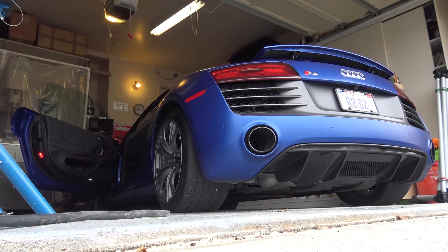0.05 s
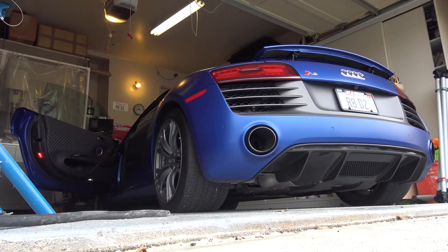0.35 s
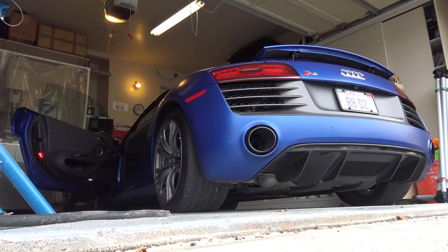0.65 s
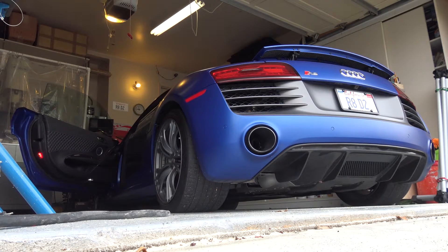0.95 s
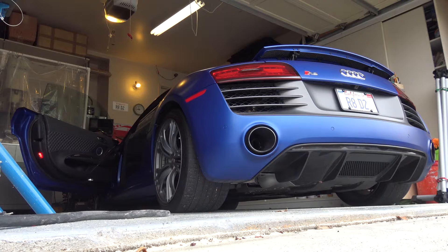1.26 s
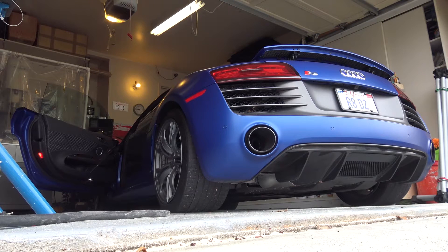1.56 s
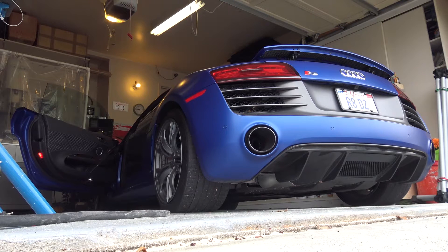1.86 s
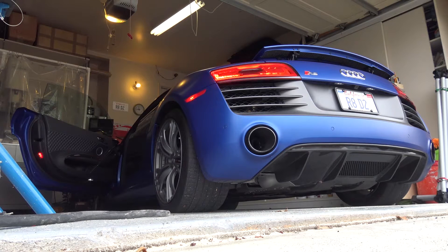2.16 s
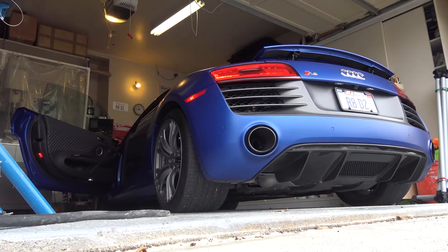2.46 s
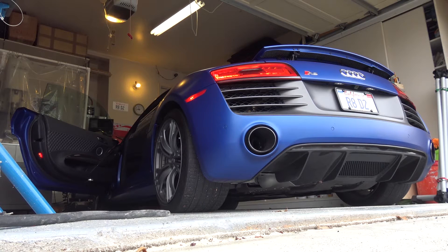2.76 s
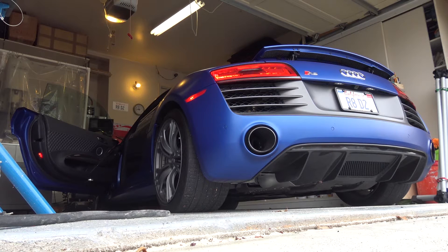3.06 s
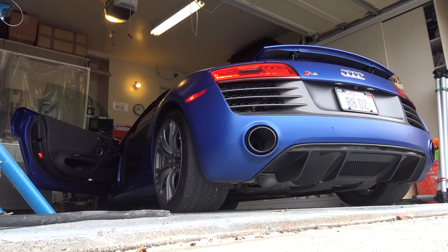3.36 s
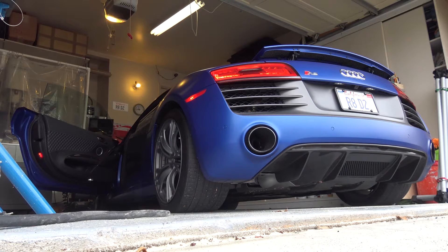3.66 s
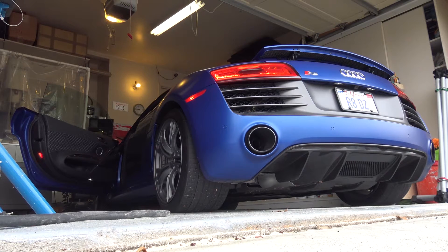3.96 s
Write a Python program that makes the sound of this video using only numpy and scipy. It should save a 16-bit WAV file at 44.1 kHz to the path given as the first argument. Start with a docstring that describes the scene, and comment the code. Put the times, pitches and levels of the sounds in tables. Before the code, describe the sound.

A sports car cranks with a grinding starter, then fires with a deep boom.

```python
"""A sports car is cold-started in a garage, heard from just behind its tail pipes.
Over a low hum and a few small ticks, the solenoid throws in the starter pinion with clacks and squeals.
The gears grind against one compression after another, while pumped air sets the pipes ringing.
Then the engine fires: periodic gas pulses make a deep boom that overloads the microphone."""
import sys
import numpy as np
from scipy import signal
from scipy.fft import rfft, irfft
from scipy.io import wavfile

SR = 44100
rng = np.random.default_rng(int(sys.argv[2]) if len(sys.argv) > 2 else 0)


def file_out(sig):
    """Save sig as 16-bit WAV at sys.argv[1]."""
    # one column per channel
    cols = np.atleast_2d(sig).T
    # limit, then scale
    lim = np.clip(cols, -1, 1)
    pcm = np.round(lim * 32767).astype(np.int16)
    wavfile.write(sys.argv[1], SR, pcm)


N = 176400
T = np.arange(N) / SR

# Levels are relative, ahead of reverberation, panning and limiting; a spectrum gives shape only.
# room noise spectrum: frequency_hz, gain_db
ROOM_SPECTRUM = [(25, -12), (40, -3), (64, -9.5), (88, -5), (125, 1), (150, -6), (243, -16), (275, -25),
                 (360, -22.5), (500, -26.5), (800, -30.5), (1100, -25.5), (1400, -35), (4000, -43),
                 (15000, -49)]
# electric hum: pitch_hz, level_db
HUM_LINES = [(59.2, -50.5), (118.4, -48), (241.5, -58)]
# fading hiss: time_s, level_db
HISS_LEVELS = [(0, -51.5), (.15, -59.5), (.4, -68), (1.1, -85)]
# hiss spectrum: frequency_hz, gain_db
HISS_SPECTRUM = [(500, -3), (1500, 4), (2800, -4.5), (4500, -2.5), (10000, -9), (15000, -15)]
# small ticks: start_s, snap_db, ring_db, ring_hz
TICK_EVENTS = [(.169, -62, -49, 6030), (.615, -54, -75, 5110), (.6594, -67, -58, 5110),
               (.7507, -51, -43.5, 5110), (0.7766, -57, -44.5, 5100), (0.915, -49, -84, 5110)]
# snap spectrum: frequency_hz, gain_db
TICK_SPECTRUM = [(800, -1), (2500, -3), (6000, -4), (11000, 0), (15000, -13)]

# solenoid and pinion impacts: start_s, level_db, t60_s, cutoff_hz
CLACK_EVENTS = [(2.036, -44, 0.088, 4100), (2.125, -33, 0.18, 11000), (2.138, -35, 0.08, 13000),
                (2.157, -29, 0.11, 4000), (2.16, -26, 0.078, 11000), (2.179, -44, 0.64, 6900),
                (2.318, -32.5, 0.1, 6300)]
# spectrum of clacks and scrape: frequency_hz, gain_db
PINION_SPECTRUM = [(100, -1), (600, 4), (1800, 1), (4000, -2.5), (7000, -4.5), (11000, -0.5), (15000, -7)]
# thuds through the car body: start_s, level_db
BODY_THUDS = [(2.045, -43), (2.177, -26.5)]
# whine of the energised starter: pitch_hz, level_db
WHINE_LINES = [(1803, -53.5), (3004, -50), (4221, -57), (6611, -52.5), (10153, -62)]
# fizz around the whine: frequency_hz, gain_db
FIZZ_SPECTRUM = [(500, 9), (3000, -11), (10500, -7), (15000, -14)]
# pinion scraping as it spins up: time_s, level_db
SCRAPE_LEVELS = [(2.29, -51.5), (2.318, -38.5), (2.33, -32.5), (2.39, -34), (2.42, -90)]
# spin-up squeals: start_s, level_db, pitch_hz, hold_s
SQUEAL_EVENTS = [(2.34, -28, 9771, .02), (2.338, -28, 13437, .038)]

# compression strokes: start_s, gear_db, lower_pipe_db, upper_pipe_db
COMPRESSION_STROKES = [(2.384, -16.5, -27, -50), (2.474, -19, -34, -17), (2.608, -18, -37, -23),
                       (2.68, -22, -45, -24), (2.792, -15.5, -22.5, -30), (2.919, -15, -19.5, -28.5),
                       (3.065, -16.5, -26.5, -32), (3.21, -16, -23.5, -31), (3.35, -15, -27, -27.5),
                       (3.495, -14.5, -25, -37.5), (3.63, -15, -24, -22)]
STROKE_ATTACK_S, STROKE_HOLD_S = 0.016, 0.05
# starter housing resonances: centre_hz, width_hz, gain_db
HOUSING_MODES = [(552, 19, -5.5), (1006, 70, 2.5), (1167, 17, 0.5), (1704, 30, -5), (1932, 55, 3.5),
                 (2186, 47, -4), (2900, 16, -6), (3535, 20, -8), (4015, 95, -0.5), (5000, 30, -3),
                 (8340, 140, -5)]
# loaded gears: frequency_hz, gain_db
GEAR_SPECTRUM = [(150, -8.5), (400, -8.5), (560, -10.5), (850, -14), (1000, -2), (1450, 4.5), (2000, -1.5),
                 (2600, -6.5), (4500, -10), (7000, -17), (14000, -45)]
# brighter rasp of the teeth: frequency_hz, gain_db
RASP_SPECTRUM = [(300, -1), (850, 0.5), (1100, -3.5), (2500, 2), (4200, -1), (5500, -4.5), (8500, -8),
                 (11000, -12.5), (15500, -28.5)]
# continuous grind of the starter: time_s, level_db
GRIND_LEVELS = [(2.36, -59), (2.378, -22.5), (2.391, -15.5), (2.45, -37), (2.55, -22), (2.9, -26),
                (3.3, -22.5), (3.6, -23), (3.73, -14.5), (3.82, -10.5), (3.92, -21.5), (4, -32.5)]
# rumble of the turning engine: time_s, level_db
RUMBLE_LEVELS = [(2.38, -39), (2.42, -22), (2.7, -24), (2.78, -25.5), (3.5, -28), (3.72, -25)]
# rumble and thumps: frequency_hz, gain_db
RUMBLE_SPECTRUM = [(20, -43), (35, 5.5), (60, -0.5), (90, -2), (150, 2), (270, -6), (350, -4.5), (440, -32),
                   (1000, -51)]
# crash of the pinion taking the load: frequency_hz, gain_db
CRASH_SPECTRUM = [(400, -0.5), (2500, -7.5), (3800, 1.5), (6000, -1.5), (7500, -17), (11000, -14),
                  (15000, -37)]
# rising gear tones: middle_s, level_db, pitch_hz, sigma_s
GEAR_TONES = [(2.505, -27, 1143, 0.036), (2.62, -21, 1439, 0.018), (2.745, -23.5, 1436, 0.032),
              (2.84, -29, 1364, 0.0093), (2.885, -29, 1486, .02), (2.944, -20, 1892, 0.0095),
              (3.012, -18.5, 1560, 0.022), (3.14, -22, 1588, 0.03), (3.28, -23, 1570, 0.033),
              (3.42, -21.5, 1537, 0.043), (3.545, -23, 1615, 0.013), (3.595, -21, 1955, 0.0093)]
# their partials: pitch_ratio, gain_db
GEAR_PARTIALS = [(.655, -7), (1, 1), (2.65, -12.5)]
# high scuffs of metal: middle_s, level_db, centre_hz
SCUFF_EVENTS = [(2.645, -42, 11500), (2.865, -36, 14300), (3.29, -35, 13100)]

# engine run-up: time_s, firing_rate_hz, level_db
FIRING_CURVE = [(3.722, 53, -21), (3.746, 52, -7), (3.785, 59.5, 2.5), (3.85, 67, 0.5), (3.9, 86, 1),
                (3.95, 92, 1.5), (4, 106, 0)]
# blast strength of successive firings, repeating: gain_db
CYLINDER_GAINS = [0, -6.5, 0, -13, 3.5]
# response of the exhaust pipes: frequency_hz, gain_db
PIPE_SPECTRUM = [(50, -3), (70, -1), (95, 1), (120, 2.5), (145, -1.5), (190, -2), (270, -1), (335, -11),
                 (430, -31), (590, -13), (850, -33)]
# upper edge of the boom: time_s, cutoff_hz
BOOM_CUTOFF = [(3.79, 160), (3.83, 328), (3.9, 995)]
# gas blast spectrum: frequency_hz, gain_db
BLAST_SPECTRUM = [(20, -23), (40, -4.5), (70, 6.5), (280, -5.5), (400, -19), (600, -10), (1050, -19),
                  (2000, -15), (3500, -35.5), (15000, -42)]
# rattles as the first cylinders catch: start_s, level_db
RATTLE_EVENTS = [(3.75, -14), (3.772, -21), (3.811, -6.5), (3.833, -14), (3.899, -15)]
# rattle spectrum: frequency_hz, gain_db
RATTLE_SPECTRUM = [(800, -15), (2500, 7), (9000, -6.5), (15000, -7)]
# whine rising with the revs: time_s, level_db, pitch_hz
REV_WHINE_CURVE = [(3.83, -27, 832), (3.88, -22, 852), (4, -20, 901)]

# stereo side signal against the mid: frequency_hz, gain_db
SIDE_SPECTRUM = [(40, -35), (250, -14), (1200, -28), (4000, -18.5), (14000, -19.5)]
# balance of the background: frequency_hz, left_minus_right_db
ROOM_PAN = [(60, -6), (170, 2.5), (1000, -4), (6000, 3)]
# balance of the metal sounds: frequency_hz, left_minus_right_db
METAL_PAN = [(500, -0.55), (4000, 1.54), (9000, 0.6)]
# balance of the engine: frequency_hz, left_minus_right_db
ENGINE_PAN = [(30, 6), (65, -8), (130, 0.1), (300, 0)]


def from_db(db):
    """Amplitude ratio of a level in decibels."""
    return 10 ** (np.asarray(db) / 20)


def unit_rms(x):
    """Normalisation to unit power."""
    return x / np.sqrt(np.mean(x ** 2) + 1e-20)


def noise():
    """Gaussian white noise."""
    return rng.standard_normal(N)


def in_time(rows):
    """Linear interpolation of each column of a curve to every sample."""
    times, *columns = np.transpose(rows)
    return [np.interp(T, times, column) for column in columns]


def at_hz(spectrum, hz):
    """Interpolation of a spectrum on a log-frequency axis."""
    frequencies, db = np.transpose(spectrum)
    return np.interp(np.log(np.maximum(hz, 1)), np.log(frequencies), db)


def envelope(rows):
    """Amplitude envelope of a level curve, silent before its first point."""
    return from_db(in_time(rows)[0]) * (T > rows[0][0])


def colour(x, spectrum):
    """Minimum-phase filtering: folding the cepstrum makes the response causal."""
    size = 2 * N
    gain = from_db(at_hz(spectrum, np.arange(N + 1) * SR / size))
    cepstrum = irfft(np.log(gain))
    cepstrum[1:N] *= 2
    cepstrum[N + 1:] = 0
    return irfft(rfft(x, size) * np.exp(rfft(cepstrum)))[:N]


def coloured_noise(spectrum):
    """Spectrally shaped noise of unit rms."""
    return unit_rms(colour(noise(), spectrum))


def resonate(x, hz, width_hz):
    """A two-pole resonator with unit peak gain."""
    r = np.exp(-np.pi * width_hz / SR)
    feedback = [1, -2 * r * np.cos(2 * np.pi * hz / SR), r * r]
    return signal.lfilter(np.array([1, 0, -1]) * (1 - r * r) / 2, feedback, x)


def drift(rate_hz):
    """Random modulation: low-passed noise of unit rms."""
    white = rfft(noise())
    hz = np.arange(len(white)) * SR / N
    return unit_rms(irfft(white / (1 + (hz / rate_hz) ** 2), N))


def tone(hz, waver_hz, rate_hz=25):
    """A sine of unit rms under random frequency modulation."""
    cycles = np.cumsum(hz + waver_hz * drift(rate_hz)) / SR + rng.random()
    return np.sqrt(2) * np.sin(2 * np.pi * cycles)


def swell(start_s, attack_s, hold_s, release_db_per_s):
    """Linear attack, then exponential release from hold_s after the start."""
    attack = np.clip((T - start_s) / attack_s, 0, 1)
    return attack * from_db(-release_db_per_s * np.maximum(T - start_s - hold_s, 0))


def dying(start_s, t60_s):
    """Free decay: a sudden onset, then a fall of 60 dB in t60_s."""
    return (T >= start_s) * from_db(-60 * np.maximum(T - start_s, 0) / t60_s)


def bump(middle_s, sigma_s):
    """A Gaussian envelope."""
    return np.exp(-0.5 * ((T - middle_s) / sigma_s) ** 2)


def reflections(x, delay_s, t60_s):
    """Diffuse echoes: convolution with decaying noise of unit energy."""
    echoes = noise() * dying(delay_s, t60_s)
    return signal.fftconvolve(x, echoes / np.sqrt(np.sum(echoes ** 2)))[:N]


def garage(x, wet_db):
    """Reverberation: direct sound and reflections from floor and walls share the power."""
    wet = from_db(wet_db)
    return (x + wet * reflections(x, delay_s=0.0024, t60_s=0.45)) / np.sqrt(1 + wet ** 2)


def place(x, pan):
    """Level differences locate a source band by band; early reflections widen it."""
    side = colour(reflections(x, delay_s=0.001414, t60_s=0.13), SIDE_SPECTRUM)
    lean = from_db(at_hz(pan, np.arange(N + 1) * SR / (2 * N)) / 2)
    return irfft(rfft([x + side, x - side], 2 * N) * np.array([lean, 1 / lean]))[:, :N]


def background():
    """The line spectrum of an electric hum lies over broadband rumble and a fading hiss."""
    hum = sum(from_db(db) * tone(hz, waver_hz=3.1) for hz, db in HUM_LINES)
    hiss = from_db(in_time(HISS_LEVELS)[0]) * coloured_noise(HISS_SPECTRUM)
    return from_db(-43) * coloured_noise(ROOM_SPECTRUM) + hum + hiss


def ticks():
    """Small broadband transients, some with the short ring of a damped resonance."""
    snap = coloured_noise(TICK_SPECTRUM)
    out = 0
    for start, snap_db, ring_db, hz in TICK_EVENTS:
        ring = unit_rms(resonate(noise(), hz, width_hz=480))
        out += from_db(snap_db) * dying(start, t60_s=0.08) * snap
        out += from_db(ring_db) * dying(start, t60_s=0.1) * ring
    return garage(out, wet_db=-8)


def pinion():
    """Impacts of solenoid and pinion give low-passed noise bursts; friction then adds a scrape."""
    contact = coloured_noise(PINION_SPECTRUM)
    clacks = 0
    for start, db, t60, cutoff_hz in CLACK_EVENTS:
        dulled = signal.lfilter(*signal.butter(2, cutoff_hz, fs=SR), contact)
        clacks += from_db(db) * dying(start, t60) * unit_rms(dulled)
    return garage(clacks + envelope(SCRAPE_LEVELS) * contact, wet_db=-8.5)


def thuds(mode_hz=158.4):
    """The struck car body vibrates freely in one damped mode."""
    return sum(from_db(db) * dying(start, t60_s=0.49) * np.sin(2 * np.pi * mode_hz * (T - start))
               for start, db in BODY_THUDS)


def starter_whine():
    """The energised starter emits thin inharmonic partials over a noise fizz."""
    partials = sum(from_db(db) * tone(hz, waver_hz=20.2, rate_hz=105) for hz, db in WHINE_LINES)
    fizz = from_db(-44.5) * coloured_noise(FIZZ_SPECTRUM)
    return swell(start_s=2.093, attack_s=0.025, hold_s=0.207, release_db_per_s=360) * (partials + fizz)


def squeals():
    """The starter squeals as it spins up: fast frequency modulation spreads each tone into a band."""
    out = 0
    for start, db, hz, hold in SQUEAL_EVENTS:
        level = from_db(db) * swell(start, attack_s=0.0024, hold_s=hold, release_db_per_s=1006)
        out += level * tone(hz, waver_hz=125, rate_hz=350)
    return garage(out, wet_db=-17)


def teeth(tooth_hz, scatter_db, decay_per_tooth, jitter=0.13):
    """Forced vibration: gear teeth land with uneven strength and excite the housing modes."""
    cycles = np.cumsum(tooth_hz * (1 + jitter * drift(150))) / SR
    strength = from_db(scatter_db * np.clip(noise(), -2, 2))[cycles.astype(int)]
    knocks = strength * np.exp(-decay_per_tooth * (cycles % 1)) * noise()
    return knocks + sum(from_db(db) * resonate(knocks, hz, width) for hz, width, db in HOUSING_MODES)


def compressions(attack_s, hold_s, release_db_per_s):
    """Cyclic loading: one swell for each compression stroke."""
    return np.max([from_db(db) * swell(start, attack_s, hold_s, release_db_per_s)
                   for start, db, *_ in COMPRESSION_STROKES], axis=0)


def grinding(mesh_hz=526.6, speed_swing=0.055):
    """Load modulates level and tooth rate: each compression makes the gears louder and slower."""
    load = compressions(STROKE_ATTACK_S, STROKE_HOLD_S, release_db_per_s=119.5)
    bite = from_db(-3) * compressions(attack_s=0.0083, hold_s=0.01, release_db_per_s=112)
    tooth_hz = mesh_hz * (1 + speed_swing * (0.5 - load / load.max()))
    gears = colour(teeth(tooth_hz, scatter_db=1.5, decay_per_tooth=1.2), GEAR_SPECTRUM)
    rasp = colour(teeth(tooth_hz, scatter_db=1.7, decay_per_tooth=0.48), RASP_SPECTRUM)
    return load * unit_rms(gears) + np.hypot(bite, envelope(GRIND_LEVELS)) * unit_rms(rasp)


def pumping(pipe_hz=(141.9, 231.7)):
    """Air-column resonance: each puff of unburnt air thumps and rings two pipe modes, over a rumble."""
    puffs = 0
    for start, _, *levels in COMPRESSION_STROKES:
        ringing = sum(from_db(db) * tone(hz, waver_hz=8) for hz, db in zip(pipe_hz, levels))
        puffs += swell(start, attack_s=0.024, hold_s=0.029, release_db_per_s=109) * ringing
    thumps = from_db(-11) * compressions(STROKE_ATTACK_S, STROKE_HOLD_S, release_db_per_s=206)
    return puffs + np.hypot(thumps, envelope(RUMBLE_LEVELS)) * coloured_noise(RUMBLE_SPECTRUM)


def crash():
    """An impact radiates bright noise as the pinion first takes the load."""
    burst = swell(start_s=2.388, attack_s=0.0025, hold_s=0.0099, release_db_per_s=151)
    return from_db(-12) * burst * coloured_noise(CRASH_SPECTRUM)


def singing(relative_rise_per_s=0.45):
    """Gear pitch follows rotation: short tones glide upwards as the starter recovers speed."""
    out = 0
    for middle, db, hz, sigma in GEAR_TONES:
        pitch_hz = hz * (1 + relative_rise_per_s * (T - middle)) + 12.3 * drift(72.4)
        cycles = np.cumsum(pitch_hz) / SR + rng.random()
        partials = sum(from_db(gain_db) * np.sin(2 * np.pi * ratio * cycles)
                       for ratio, gain_db in GEAR_PARTIALS)
        out += from_db(db) * bump(middle, sigma) * np.sqrt(2) * partials
    return out


def scuffs():
    """Metal friction gives brief swells of high band noise during cranking."""
    return sum(from_db(db) * bump(middle, sigma_s=0.02) * unit_rms(resonate(noise(), hz, width_hz=1500))
               for middle, db, hz in SCUFF_EVENTS)


def boom(firing_hz, firings, cutoff_hz, flutter_db=2.5, wobble_rad=0.22):
    """Periodic firing gives a harmonic series, weighted by the pipes and low-passed."""
    out = 0
    for k in range(1, 9):
        gain = from_db(at_hz(PIPE_SPECTRUM, k * firing_hz) + flutter_db * drift(33))
        gain /= np.sqrt(1 + (k * firing_hz / cutoff_hz) ** 6)
        phase = 2 * np.pi * (k * firings + rng.random()) + wobble_rad * k * drift(32)
        out += gain * np.sin(phase)
    return out


def blast(firings, cutoff_hz, decay_per_firing=1.2):
    """Each firing releases a noisy pulse of gas; a low resonance gives way to the full spectrum."""
    strength = from_db(CYLINDER_GAINS)[firings.astype(int) % len(CYLINDER_GAINS)]
    pulses = strength * noise() * np.exp(-decay_per_firing * (firings % 1))
    gas = unit_rms(colour(pulses, BLAST_SPECTRUM))
    muffled = resonate(gas, hz=95, width_hz=91)
    opened = (cutoff_hz / cutoff_hz.max()) ** 0.12
    return garage(opened * gas + (1 - opened) * muffled, wet_db=-6.5)


def exhaust():
    """Boom and blast share the firing period; their bandwidth grows as the revs climb."""
    firing_hz, db = in_time(FIRING_CURVE)
    level = from_db(db) * (T > FIRING_CURVE[0][0])
    firings = np.cumsum(firing_hz) / SR
    cutoff_hz = in_time(BOOM_CUTOFF)[0]
    harmonics = from_db(-0.74) * boom(firing_hz, firings, cutoff_hz)
    return level * (harmonics + from_db(-5.5) * blast(firings, cutoff_hz))


def rattles():
    """Bright transients decay exponentially as the first cylinders catch."""
    level = sum(from_db(db) * dying(start, t60_s=0.098) for start, db in RATTLE_EVENTS)
    return level * coloured_noise(RATTLE_SPECTRUM)


def rev_whine():
    """A single partial glides upwards with the revs."""
    _, pitch_hz = in_time(REV_WHINE_CURVE)
    return envelope(REV_WHINE_CURVE) * tone(pitch_hz, waver_hz=6.05)


def scene():
    """Superposition of background, metal and engine, each at its place in the stereo field."""
    metal = ticks() + pinion() + thuds() + starter_whine() + squeals()
    metal += garage(grinding() + crash() + scuffs(), wet_db=-6.5) + singing() + rattles()
    room = place(background(), ROOM_PAN)
    return room + place(metal, METAL_PAN) + place(pumping() + exhaust() + rev_whine(), ENGINE_PAN)


def record(dry, limit_db=5, attack_s=0.0077, release_db_per_s=23, hardness=3.2, cutoff_hz=15750):
    """Overload: a limiter ducks under the boom, saturation flattens peaks, a low-pass cuts the top."""
    peak_db = 20 * np.log10(np.abs(dry).max(axis=0) + 1e-9)
    over_db = np.maximum(peak_db - limit_db, 0)
    held_db = np.maximum.accumulate(over_db + release_db_per_s * T) - release_db_per_s * T
    pole = np.exp(-1 / (attack_s * SR))
    limited = dry * from_db(-signal.lfilter([1 - pole], [1, -pole], held_db))
    clipped = limited / (1 + np.abs(limited) ** hardness) ** (1 / hardness)
    return signal.sosfiltfilt(signal.ellip(10, 0.05, 60, cutoff_hz, fs=SR, output="sos"), clipped)


dry = scene()
out = record(dry)
file_out(out)
```